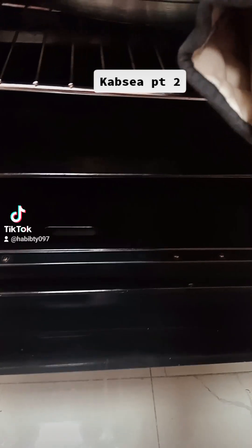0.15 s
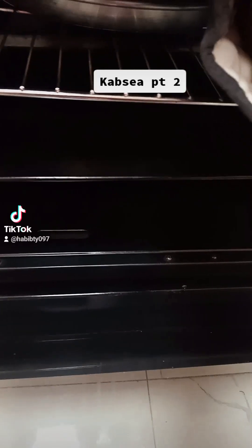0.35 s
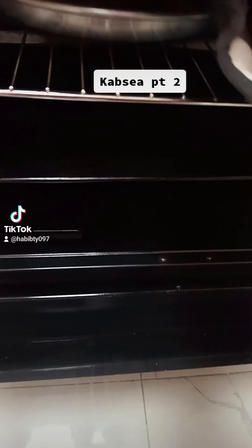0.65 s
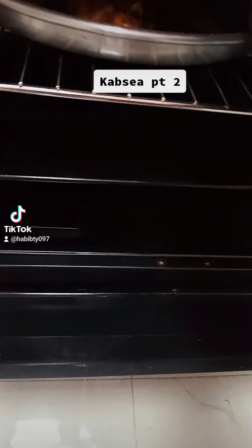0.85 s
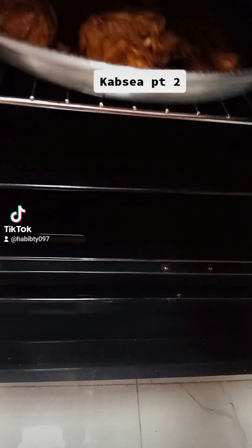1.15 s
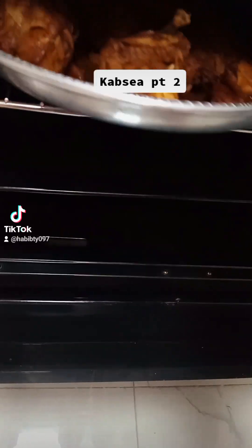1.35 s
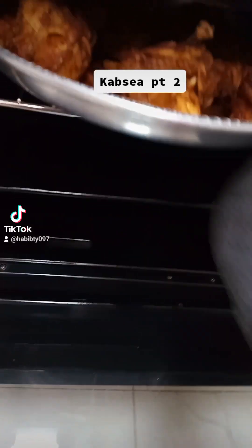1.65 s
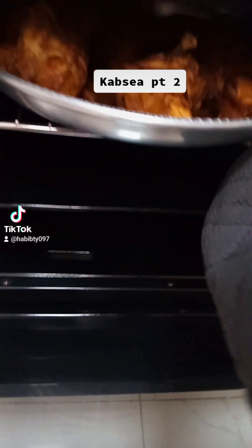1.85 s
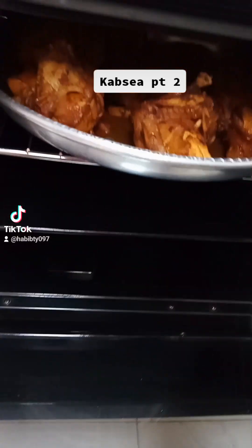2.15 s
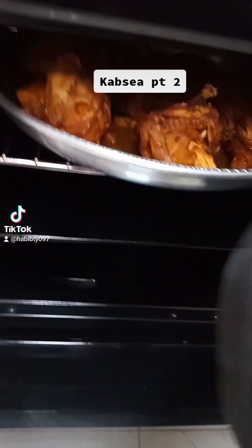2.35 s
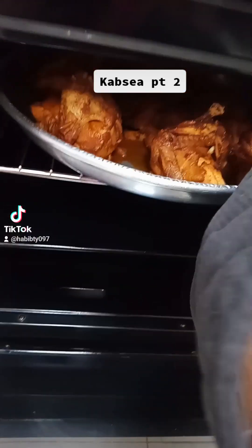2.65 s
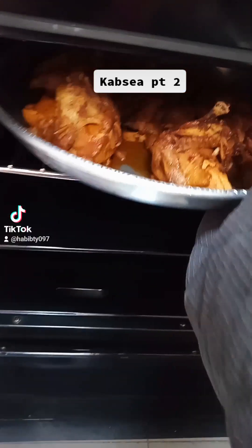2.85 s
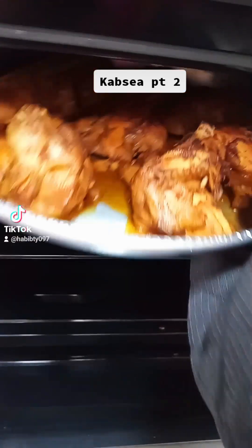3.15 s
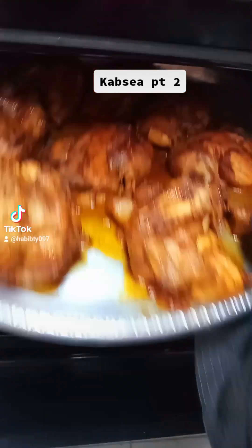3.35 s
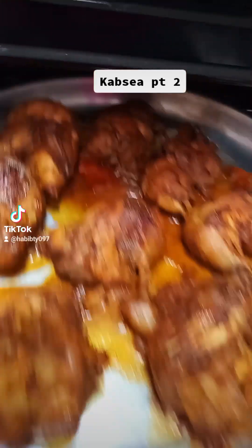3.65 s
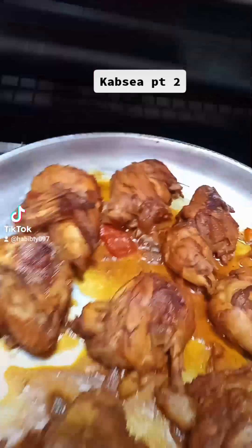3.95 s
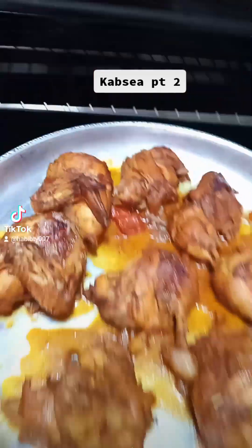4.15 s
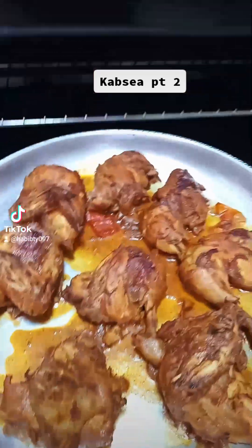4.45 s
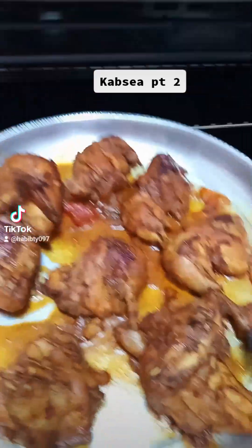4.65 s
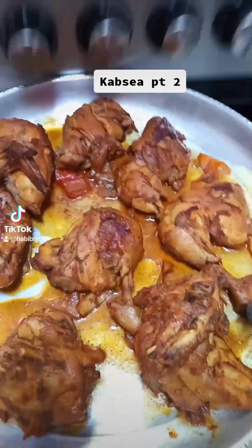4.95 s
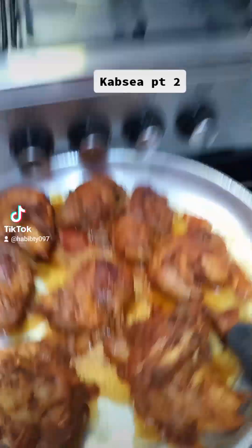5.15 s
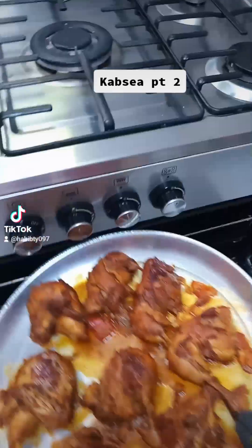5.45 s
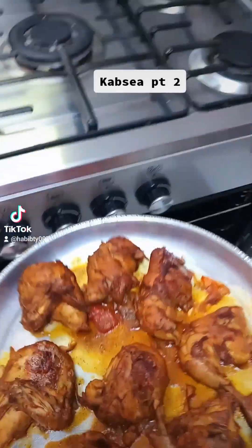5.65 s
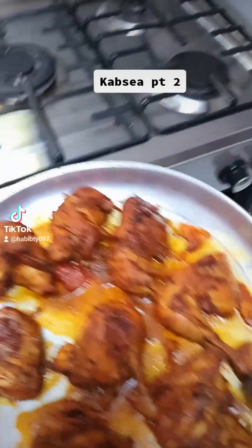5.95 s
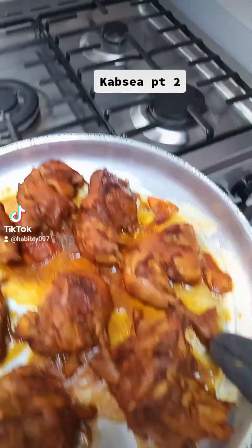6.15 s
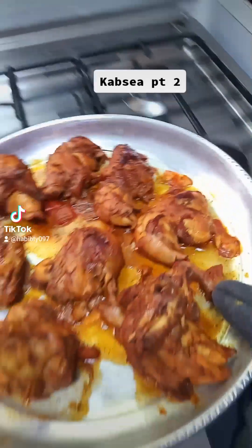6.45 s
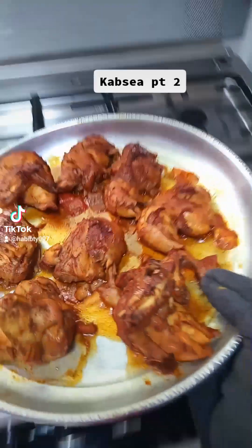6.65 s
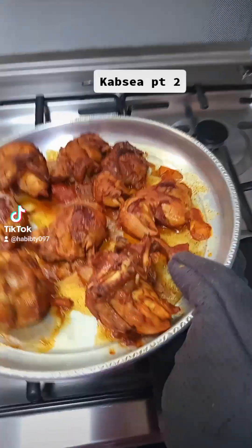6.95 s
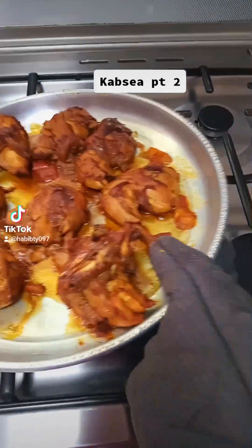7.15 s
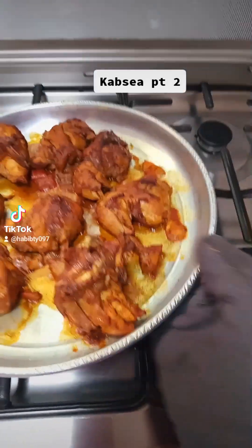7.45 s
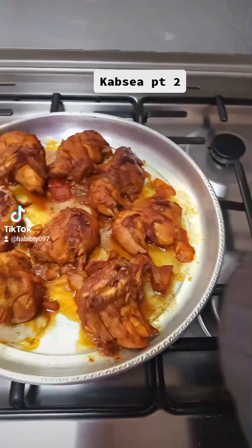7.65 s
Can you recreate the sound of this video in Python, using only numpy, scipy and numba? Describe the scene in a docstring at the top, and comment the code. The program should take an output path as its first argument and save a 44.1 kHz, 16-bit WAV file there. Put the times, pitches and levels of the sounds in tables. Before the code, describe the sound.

In a small hard kitchen, close to a handheld phone, a mitt softly bumps a metal tray. Light wiry ticks follow, then a rattle and a rough scrape over the oven rack, leaving wires ringing. After a lull come loud bangs on the oven door. Another pause, then the tray clatters onto an iron stove grate, slides shortly and rings out over faint hum and hiss.

```python
"""A mitt's soft tug, wiry scrapes and rattles, hard bangs, then iron clatter and a short slide, over faint hum and hiss.
A round metal tray is tugged by a mitt, scraped over a wire oven rack, bumped on the oven door and set down
and slid on an iron stove grate. Contact grit and blows make a dense wash that feeds the modes of each body;
wires, bars and the tray skin sing on as decaying sines. A small hard kitchen adds echoes, and a hand-held
phone with two ports hears it all."""
import sys
import numpy as np
from scipy import signal
from scipy.fft import rfft, irfft, next_fast_len
from scipy.io import wavfile
from scipy.ndimage import uniform_filter1d
from numba import njit

SR = 44100
rng = np.random.default_rng(int(sys.argv[2]) if len(sys.argv) > 2 else 0)


def output_pcm(signal):
    """Save a mono or channel-first signal as 16-bit PCM at the path in sys.argv[1].

    Samples are clipped to [-1, 1] before scaling.
    """
    pcm = np.clip(np.atleast_2d(signal).T, -1, 1) * 32767
    wavfile.write(sys.argv[1], SR, np.round(pcm).astype(np.int16))


N = 344421
TIME = np.arange(N) / SR
PORT_LAG = 8  # samples by which the left port hears later


def undb(db):
    """Amplitude ratio of a level in dB."""
    return 10 ** (np.asarray(db) / 20)


def unit(x):
    """Scale to an RMS of 1."""
    return x / np.sqrt(np.mean(x ** 2))


def ring(x, hz, width_hz):
    """Two-pole resonance, gain 1 at its centre."""
    return signal.lfilter(*signal.iirpeak(hz, hz / width_hz, SR), x)


def tone_level(tone, hz):
    """Level in dB of a spectrum at a frequency, straight between its points on a log axis."""
    tone_hz, tone_db = np.transpose(tone)
    return np.interp(np.log(hz), np.log(tone_hz), tone_db)


def colour(x, tone, lo_hz, hi_hz):
    """Shape by a spectrum, then part into boom, middle and edge, each of unit strength."""
    length = x.shape[-1]
    size = next_fast_len(length)
    hz = np.arange(size // 2 + 1) * SR / size + 1
    shaped = rfft(x, size) * undb(tone_level(tone, hz))
    low = 1 / (1 + (hz / lo_hz) ** 4)
    high = 1 / (1 + (hi_hz / hz) ** 6)
    return [unit(irfft(shaped * band, size)[..., :length]) for band in (low, 1 - low - high, high)]


def ports(size, alike_hz, grit_db):
    """Gritty noise at both ports: the left one lags, and above alike_hz each hears more of its own."""
    grit = np.minimum(rng.exponential(size=size + PORT_LAG), 5)
    grains = rng.standard_normal((3, size + PORT_LAG)) * undb(grit_db * grit)
    shared = np.array([grains[0, :size], grains[0, PORT_LAG:]])
    own = signal.lfilter(*signal.butter(1, alike_hz, "high", fs=SR), grains[1:, :size])
    return shared + 1.11 * own


def walk(rate, size=N):
    """Random levels held 1 / rate s and slewed twice."""
    hold = int(SR / rate)
    steps = np.repeat(rng.standard_normal(size // hold + 1), hold)
    slewed = uniform_filter1d(uniform_filter1d(steps, hold), hold)
    return 1.31 * slewed[:size]


def tray_pan(s):
    """Left minus right level in dB of the tray at time s, as the phone follows it."""
    # place of the tray: t/s, left minus right level/dB
    pan_path = [(0, -4), (1.2, -5), (2.2, -1.5), (2.9, -7.5), (3.4, -0.5), (4.7, -2), (5.0, 0.5),
                (6.55, -2), (6.8, -1), (7.16, -1.5), (7.3, -0.5), (7.81, 0.5)]
    return np.interp(s, *np.transpose(pan_path))


def air():
    """Kitchen background: coloured noise whose hum and hiss follow slow level curves and waver."""
    # background levels: t/s, hum level/dB, hiss level/dB
    air_levels = [(0, -62.5, -62), (1.2, -62, -62.5), (2.1, -64, -68), (3.5, -63.5, -63), (4.5, -63.5, -67),
                  (5.901, -63, -67.5), (7.099, -65, -65.5), (7.81, -71, -73)]
    # noise spectrum: f/Hz, level per Hz/dB
    air_tone = [(25, -48), (55, -17), (90, 2), (125, -6), (200, -1.5), (300, -5), (600, -13), (2000, -26),
                (4000, -22), (6300, -16), (7500, -18.5), (9500, -12.5), (11500, -28), (13300, -29.5),
                (15200, -16.5), (16500, -36)]
    s, hum_db, hiss_db = np.transpose(air_levels)
    hum_db, hiss_db = np.interp(TIME, s, hum_db), np.interp(TIME, s, hiss_db)
    low, mid, high = colour(ports(N, 500., 0.5), air_tone, 1200., 3000.0)
    hum = low * undb(hum_db + 1.2 * walk(4.3))
    middle = mid * undb((hum_db + hiss_db) / 2 - 4.0 + walk(4.6))
    hiss = high * undb(hiss_db + walk(21))
    return hum + middle + hiss


def rattle(s, db, fade_db_s, length, boom_db, edge_db):
    """A rattle as a stroke: quick rise, steady fade that dulls it, quick stop."""
    rise_s, stop_s = 0.015, 0.053
    drop_db = fade_db_s * length
    times = s + np.array([0, rise_s, length, length + stop_s])
    levels = db - np.array([16, 0, drop_db, drop_db + 31.0])
    # the edge loses an extra 0.18 dB for each dB of fade
    edges = edge_db - 0.18 * drop_db * np.array([0, 0, 1, 1])
    return times, levels, edges, boom_db


def contact(slide, slide_boom_db, rattles, hits, judder_db, boom_lag):
    """Power that strokes and blows put into boom, middle and edge at both ports."""
    power = np.zeros((3, 2, N))
    sides = np.array([[1], [-1]])
    # stick and slip is never even, and each band catches partly on its own
    judder = judder_db * (walk(60) + 0.8 * np.array([walk(40), walk(70), walk(110)]))
    strokes = [rattle(*row) for row in rattles]
    if slide:
        strokes.append((*np.transpose(slide), slide_boom_db))
    for s, db, edge_db, boom_db in strokes:
        on = slice(int(s[0] * SR), int(s[-1] * SR))
        t, top_db = TIME[on], db.max()
        db, edge_db = np.interp(t, s, db), np.interp(t, s, edge_db)
        # once the contact has begun, the boom follows only part of each drop in level
        boom_db = boom_db + boom_lag * (top_db - db) * (t > s[1])
        bands = db + judder[:, on] + np.array([boom_db, 0 * db, edge_db])
        # the higher the band, the more it shows where the tray is
        pan_db = np.array([0, .5, 1])[:, None, None] * sides * tray_pan(t)
        power[:, :, on] += undb(2 * bands[:, None] + pan_db)
    for s, db, boom_db, edge_db, t60, _ in hits:
        on = slice(int(s * SR), int((s + 1.5 * t60) * SR))
        t = TIME[on] - TIME[on][0]
        # the boom swells late and stays, the edge cracks at once and dies first
        rise = 1 - np.exp(-t / np.array([[.004], [.0009], [.0005]]))
        rise[1:] *= 1 + 1.3 * np.exp(-t / 0.0028)  # the crack of first contact
        fade_db = 60 * t / (t60 * np.array([[1.6], [1], [.7]]))
        bands = db - 12.5 + np.array([[boom_db], [0], [edge_db]]) - fade_db
        power[:, :, on] += (rise ** 2 * undb(2 * bands))[:, None] * undb(sides * tray_pan(s))
    return power


@njit
def moving_ring(x, hz, width_hz):
    """Resonance whose centre moves from sample to sample, gain 1 at the centre."""
    y = np.empty_like(x)
    for c in range(len(x)):
        band, low = 0., 0.  # the two filter states
        for i in range(len(hz)):
            g, damping = np.tan(np.pi * hz[i] / SR), width_hz / hz[i]
            v = (band + g * (x[c, i] - low)) / (1 + g * (g + damping))
            band, low, y[c, i] = 2 * v - band, low + 2 * g * v, damping * v
    return y


def struck(hits, start, size, hz, width_hz, db):
    """One mode rung by every blow and left to die; the left port hears it later by a varying lag."""
    taps = np.zeros((2, size + 64))
    for (s, hit_db, *_), (strength, side) in zip(hits, rng.standard_normal((len(hits), 2))):
        at = int(s * SR) - start + np.array([PORT_LAG + int(6 * abs(side)), 0])
        # each blow lands elsewhere and wakes the mode more or less
        scatter_db = 3 * strength
        taps[[0, 1], at] += undb(hit_db + db + scatter_db + np.array([.5, -.5]) * tray_pan(s))
    # a narrow resonance answers a click weakly: lift it back to the click's level
    return ring(taps[:, :size], hz, width_hz) * SR / (2 * np.pi * width_hz)


def clinks(hits, t60, clink_db):
    """Each blow wakes a rough cluster of modes and two bar overtones above the rest."""
    out = np.zeros((2, N))
    t = np.arange(int(t60 * SR)) / SR
    share = np.array([[1], [.5], [.5], [.55], [.35]])
    for (s, db, *_, hz), chance in zip(hits, rng.random((len(hits), 2, 5, 1))):
        # each blow lands on its own spot, so the ratios vary a little
        ratio = np.array([[1], [.9], [1.04], [1.38], [1.95]]) * (1 + 0.013 * chance[0])
        clink = np.sum(share * np.sin(2 * np.pi * (hz * ratio * t + chance[1])), axis=0)
        clink *= undb(db + clink_db - 60 * t / t60) * (1 - np.exp(-t / 0.00069))
        panned = clink * undb(np.array([[.5], [-.5]]) * tray_pan(s))
        out[:, int(s * SR):][:, :len(t)] += panned[:, :N - int(s * SR)]
    return out


def metal(slide, slide_boom_db, rattles, hits, modes, tone, boom_lag, clink_db, modes_db, grit_db,
          judder_db, comb_db, sharp, linger_db, patchy_db, strike_db, linger_hz=6.9):
    """One body: contact grit makes a dense wash and feeds the named modes, which ring on after it."""
    power = contact(slide, slide_boom_db, rattles, hits, judder_db, boom_lag)
    touched = np.flatnonzero(power[1, 0])
    tail_s = .6
    on = slice(touched[0], min(touched[-1] + int(tail_s * SR), N))
    size = on.stop - on.start
    parts = colour(ports(size, 1200.0, grit_db), tone, 509.0, 3770.0)
    wash = sum(np.sqrt(p[:, on]) * x for p, x in zip(power, parts)) + 1e-18
    # countless small plate modes: a ragged bank of weak narrow resonances
    t = np.arange(3000) / SR
    plate = unit(rng.standard_normal(3000) * np.exp(-t / 0.016)) / np.sqrt(3000)
    body = wash + undb(comb_db) * signal.fftconvolve(wash, plate[None], axes=1)[:, :size]
    for hz, width_hz, db in modes:
        over_db = db - tone_level(tone, hz)
        # the contact point wanders, so each mode is fed unevenly and shifts a little
        feed = wash * undb(patchy_db * walk(18, size=size))
        drifting_hz = hz * (1 + .004 * walk(12, size=size))
        mode = moving_ring(feed, drifting_hz, width_hz / sharp)
        body += undb(modes_db + over_db) * np.sqrt(sharp) * mode
        # the heart of each mode is barely damped and lingers in the tail
        body += undb(linger_db + 0.33 * over_db) * ring(feed, hz, linger_hz * (1 + hz / 2500))
        body += struck(hits, on.start, size, hz, np.clip(0.5 * width_hz, 6, 40), strike_db + db)
    out = clinks(hits, 0.084, clink_db)
    out[:, on] += body
    return out


def mitt_tug():
    """The mitt rubs and nudges the tray: a boomy stroke and one dull blow."""
    # rubbing stroke: t/s, level/dB, edge re middle/dB
    mitt_slide = [(0.15, -74.5, 8), (0.25, -58.5, -2), (0.38, -49, -0.5), (0.432, -54.5, -1),
                  (0.572, -56, -4), (0.62, -77, -4)]
    # blow: t/s, level/dB, boom and edge re middle/dB, middle t60/s, clink f/Hz
    mitt_hits = [(0.276, -42.5, 22, -12, 0.098, 480)]
    # modes: f/Hz, width before sharpening/Hz, relative level/dB
    mitt_modes = [(171.5, 11, 3), (500, 59, -9.5), (701, 15, -17), (1990, 40, -29)]
    # colour of the dense wash: f/Hz, relative level per Hz/dB
    mitt_tone = [(18, -60), (30, -21), (176, -3), (212, -4), (493, -19.5), (593, -23.5), (676, -20),
                 (979, -29), (8990, -28.5), (15200, -45), (16500, -57)]
    return metal(mitt_slide, 7.5, [], mitt_hits, mitt_modes, mitt_tone, boom_lag=0.46, clink_db=-15.0,
                 modes_db=-6.0, grit_db=0.5, judder_db=2.0, comb_db=-11.0, sharp=2.2,
                 linger_db=-13.0, patchy_db=2.0, strike_db=-12)


def rack_scrape():
    """The tray knocks, rattles and scrapes over the wire rack, which rings in many broad modes."""
    # scrape: t/s, level/dB, edge re middle/dB
    rack_slide = [(2.8, -55, -14), (2.885, -53.5, -7), (2.927, -44, -5.5), (2.969, -47.5, -5),
                  (3.0, -32.5, -9), (3.076, -30.5, -7.5), (3.14, -31.5, -8.5), (3.198, -34.5, -4),
                  (3.27, -30.5, -10), (3.34, -31.5, -8), (3.37, -38.5, -28), (3.478, -46.5, -48),
                  (3.568, -68, -3), (3.66, -81, 11)]
    # rattles after jolts: t/s, level/dB, fade/(dB/s), length/s, boom and edge re middle/dB
    rack_rattles = [(0.791, -57, 42, 0.18, -35, -3), (2.191, -39.5, 86, 0.32, 1, -6.5),
                    (2.538, -63, 2, 0.13, 1.5, 4.5), (2.666, -46.5, 68, 0.229, -14.5, -2.5)]
    # blows: t/s, level/dB, boom and edge re middle/dB, middle t60/s, clink f/Hz
    rack_hits = [(0.559, -45, -22, -3, 0.17, 4460), (0.816, -35.5, -30, 2.5, 0.028, 3690),
                 (0.829, -42, -35, -26, 0.14, 3710), (1.023, -55, -11, -17, 0.15, 1330),
                 (1.143, -54, -18, -13, 0.1, 1390), (1.183, -53, -30, 4, 0.28, 3440),
                 (2.205, -36, -14, 11.5, 0.12, 2050), (2.563, -46.5, -8, -15, 0.091, 4240),
                 (2.65, -43, -11, -10, 0.12, 3190), (2.689, -33, -24, -12, 0.11, 3080),
                 (2.761, -39.5, -6, 4.5, 0.25, 1230), (2.928, -34.5, -14.5, -2, 0.17, 2100),
                 (2.98, -30, -13.5, 2, 0.14, 826), (3.007, -26, -18, 8, 0.11, 2034),
                 (3.204, -28.5, -5, -4, 0.2, 1890), (3.226, -29, -7, -5, 0.15, 1690),
                 (3.272, -32, -8, -5, 0.1, 2500), (3.336, -22, -21, -12, 0.044, 806)]
    # modes: f/Hz, width before sharpening/Hz, relative level/dB
    rack_modes = [(178, 32, -2), (235.4, 56, -3.5), (595, 50, -11.5), (770, 98, -6), (977, 50, -24),
                  (1692, 29, -22), (1980, 50, -15.5), (2096, 78, -8), (2450, 110, -10), (3220, 60, -14),
                  (3180, 980, -22), (3670, 110, -19), (4100, 110, -12), (5850, 120, -14), (6650, 80, -15),
                  (7280, 100, -14.5), (8000, 42, -23.5), (8760, 240, -16.5)]
    # colour of the dense wash: f/Hz, relative level per Hz/dB
    rack_tone = [(18, -83), (30, -28), (70, -9), (107, -17), (167, 0), (260, -2.5), (350, 0), (378, -4.5),
                 (577, -5.5), (713, -10), (2000, -14.5), (9730, -25), (13400, -48), (15200, -32.5),
                 (16500, -59)]
    return metal(rack_slide, -10.5, rack_rattles, rack_hits, rack_modes, rack_tone, boom_lag=0.39,
                 clink_db=-4.0, modes_db=-6.0, grit_db=4, judder_db=2.0, comb_db=-6, sharp=0.51,
                 linger_db=-10.0, patchy_db=6.0, strike_db=-15.5)


def mode_flares():
    """Short bursts of single modes of the tray, rack, door and grate, each sliding in pitch."""
    # bursts: t/s, length/s, level/dB, start f/Hz, glide/(Hz/s)
    flares = [(0.822, 0.15, -62, 900, -300), (0.83, 0.12, -60, 512, -200),
              (2.212, 0.22, -41.5, 259.8, -300), (2.218, 0.088, -44.5, 423, -200),
              (2.248, 0.14, -49.5, 667, 14), (2.46, .22, -55, 319, 40), (2.688, 0.032, -40.5, 560, 10),
              (2.932, 0.032, -35.5, 586, 10), (3.002, 0.019, -23.5, 623, 10),
              (3.052, 0.013, -21.5, 535, 1500), (3.066, 0.02, -19, 578, 1500),
              (3.14, 0.024, -45, 1970, 300), (3.222, 0.07, -34, 1710, -200), (3.413, 0.12, -43.5, 303, 300),
              (3.49, 0.071, -47.5, 998, -100), (3.09, 0.18, -35, 175.9, -32),
              (3.101, 0.039, -30, 557, -300), (3.203, 0.034, -22.5, 608, -1800),
              (3.264, 0.018, -27, 563, -300), (3.748, 0.082, -52.5, 333, 8), (4.66, 0.016, -28, 300, -1500),
              (4.876, 0.021, -22, 910, -3000), (4.877, .014, -26.5, 638, 300),
              (4.878, 0.026, -26, 2130, -300), (6.55, 0.055, -29.5, 210.4, 10),
              (7.27, 0.054, -29.5, 228, 10), (7.33, 0.079, -24.5, 1034, 15), (7.33, 0.043, -35, 712, 8),
              (7.345, 0.05, -36, 1465, 10), (7.49, 0.086, -34.5, 710, 7), (7.55, 0.16, -37, 429, -27),
              (7.67, 0.069, -61, 2710, 8.5)]
    out = np.zeros((2, N))
    for s, length, db, hz, glide in flares:
        t = TIME[:min(int(1.4 * length * SR), N - int(s * SR))]
        swell = np.minimum(t / 0.011, 1) * np.exp(-(t / length) ** 4)
        late = t - np.array([[PORT_LAG / SR], [0]])
        burst = swell * np.sin(2 * np.pi * (hz + glide * late / 2) * late)
        level = undb(db + np.array([[.5], [-.5]]) * tray_pan(s))
        out[:, int(s * SR):][:, :len(t)] += np.sqrt(2) * burst * level
    return out * undb(3.5 * walk(70))  # roughens every burst


def singing(modes, free_s, spread, swell_s, flutter_db):
    """Free rods and plates swell and die away; each mode is five untuned neighbours that beat and waver."""
    start = int(free_s * SR)
    t = TIME[:N - start]
    out = np.zeros((2, N))
    share = np.array([[.5], [.7], [1], [.7], [.5]])
    for (hz, db, t60), chance in zip(modes, rng.random((len(modes), 3, 5, 1))):
        span = t[:int(t60 * SR)]
        size = len(span)
        near_hz = hz + (8.0 + spread * hz) * (np.arange(-2, 3)[:, None] + chance[0] - .5)
        waver = np.cumsum(spread * hz * walk(50, size=size)) / SR
        fade = undb(db - 60 * span / t60 + flutter_db * walk(35, size=size))
        fade *= np.minimum(span / swell_s, 1)
        # higher modes reach the ports out of step
        for port, shift in enumerate((min(hz / 2000, 1) * chance[2], 0)):
            cycles = near_hz * span + waver + chance[1] + shift
            out[port, start:start + size] += fade * np.sum(share * np.sin(2 * np.pi * cycles), axis=0)
    return out


def rack_wires():
    """Rack wires sing on as the scrape fades."""
    # wires: f/Hz, level/dB, t60/s
    wires = [(320, -62, 6.6), (665, -59.5, 1.9), (950, -66, 6.2), (1010, -53.5, 1.2), (1520, -44.5, 0.79),
             (1693, -48.5, 1), (1930, -59, 2.14), (2166, -47, 0.68), (2360, -63, 0.82), (3140, -58, 1.5)]
    return singing(wires, free_s=3.364, spread=.008, swell_s=0.11, flutter_db=3.5)


def ticks():
    """Thin ticks: each is one very short high sine that dies within milliseconds."""
    # ticks: t/s, level/dB, f/Hz
    tick_rows = [(4.503, -56.5, 9160), (4.562, -44, 10300), (4.58, -59, 10200)]
    out = np.zeros(N)
    t = np.arange(400) / SR
    shape = np.exp(-t / 0.0037) * np.minimum(t / 0.00057, 1)
    for s, db, hz in tick_rows:
        out[int(s * SR):][:400] += undb(db) * shape * np.sin(2 * np.pi * hz * t)
    return out * undb(np.array([[1.5], [-1.5]]))


def door_bumps():
    """The tray bumps the oven door: first dull thuds on the panel, then blows that ring its frame."""
    # rattles after jolts: t/s, level/dB, fade/(dB/s), length/s, boom and edge re middle/dB
    door_rattles = [(4.609, -59.5, 22.14, 0.023, 21.5, 10), (4.659, -26.5, 99, 0.11, -1.5, -5),
                    (4.794, -31.5, 170, 0.075, -22.5, -1.5), (4.877, -28, 176, 0.073, -9, -17),
                    (4.941, -34.5, 140, .15, 0, -0.5)]
    # blows: t/s, level/dB, boom and edge re middle/dB, middle t60/s, clink f/Hz
    door_hits = [(4.661, -13, -4.5, -1, 0.088, 898), (4.679, -24.5, -8.5, -6.5, .12, 850),
                 (4.796, -7, -25, -10.5, 0.074, 3376), (4.808, -12, -19.5, -10.5, 0.044, 2050),
                 (4.834, -12, -24, -22.5, 0.024, 2030), (4.879, -9.5, -21, -21.5, 0.068, 915),
                 (4.942, -14, -13.5, 1.5, 0.05, 961)]
    # panel modes, then frame modes: f/Hz, width before sharpening/Hz, relative level/dB
    panel_modes = [(308, 35, -3), (870, 120, -5), (2000, 42, -9.5), (2620, 170, -19), (3320, 38, -13.5),
                   (4000, 48, -11), (4900, 34, -13.5), (5830, 32, -14.5), (6800, 190, -16)]
    frame_modes = [(306, 33, -3.5), (796, 62, 0), (1068, 30, 1), (1537, 50, 0.5), (2004, 41, 2),
                   (2190, 50, -0.5), (2650, 36, -2.5), (3010, 21, -12.5), (3374, 56, 1), (4050, 49, 0),
                   (4900, 30, -10), (5670, 42, -12), (5900, 40, -11), (7000, 43, -11), (9480, 1900, -10.5)]
    # colour of each dense wash: f/Hz, relative level per Hz/dB
    panel_tone = [(18, -67), (30, -32.5), (96, -7), (185, -7), (306, -7), (388, -14), (752, -12),
                  (4070, -21.5), (9730, -28.5), (15200, -57), (16500, -67)]
    frame_tone = [(18, -52.5), (30, -20), (75, -8.5), (200, 3.5), (306, 0), (506, -4), (1030, -6.5),
                  (1660, -16), (2100, -2.5), (2400, -11), (3380, -14), (3660, -12.5), (7090, -4),
                  (15200, -43), (16500, -59.5)]
    panel = metal([], 0, door_rattles[:2], door_hits[:2], panel_modes, panel_tone, boom_lag=0.37,
                  clink_db=-12.5, modes_db=-4, grit_db=1.0, judder_db=1.2, comb_db=-11.0, sharp=0.8,
                  linger_db=-12.0, patchy_db=2.5, strike_db=-5.5)
    frame = metal([], 0, door_rattles[2:], door_hits[2:], frame_modes, frame_tone, boom_lag=0.28,
                  clink_db=-11.5, modes_db=-7.0, grit_db=1.3, judder_db=1.26, comb_db=-11.0, sharp=0.79,
                  linger_db=-15.5, patchy_db=4.0, strike_db=-20.5, linger_hz=24.)
    return panel + frame


def creaks():
    """Small creaks: a train of rough slips, each a fading noise burst, rings three dull resonances."""
    # creaks: t/s, length/s, level/dB, mean slip rate/Hz, low f/Hz, middle f/Hz, high f/Hz
    creak_rows = [(5.836, 0.096, -67.5, 120, 500, 2960, 3820), (6.006, 0.1, -54, 170, 1680, 2220, 3200)]
    out = np.zeros(N)
    for s, length, db, rate, lo_hz, mid_hz, hi_hz in creak_rows:
        t = np.arange(int(length * SR)) / SR
        phase = np.cumsum(rate * (1 + 0.2 * walk(150)[:len(t)])) / SR % 1
        slips = rng.standard_normal(len(t)) * (np.exp(-phase / 0.43) + 0.4)
        slips *= undb(-16 * t / length) * np.minimum(t / 0.0054, 1)
        bands = ((lo_hz, 500.), (mid_hz, 900.), (hi_hz, 1800.))
        low, mid, high = [ring(ring(slips, hz, width), hz, width) for hz, width in bands]
        out[int(s * SR):][:len(t)] += undb(db) * unit(low + 0.65 * mid + 0.092 * high)
    return out * undb(np.array([[1.5], [-1.5]]))


def grate_landing():
    """Set down on the iron grate: first only the rim touches, then the whole tray lands and slides."""
    # slide: t/s, level/dB, edge re middle/dB
    grate_slide = [(7.165, -20.5, 2.5), (7.189, -28.5, 5), (7.329, -28, -2.5), (7.357, -24, -5),
                   (7.421, -31.5, -4), (7.46, -33.5, -12), (7.51, -39.5, -25), (7.52, -35, -8),
                   (7.586, -36, -21), (7.67, -59.5, -23), (7.81, -99, -2)]
    # rattles after jolts: t/s, level/dB, fade/(dB/s), length/s, boom and edge re middle/dB
    grate_rattles = [(6.547, -31, 107, 0.13, 2.6, -1.5), (6.708, -35.5, 89.6, 0.19, 0.68, 1.5),
                     (6.887, -44.5, 200, .2, 4.8, -3.5)]
    # blows: t/s, level/dB, boom and edge re middle/dB, middle t60/s, clink f/Hz
    grate_hits = [(6.549, -19, -16, 7, 0.082, 3860), (6.63, -18, -16, 1.5, 0.066, 3140),
                  (6.706, -17, -27, 6.5, 0.06, 3360), (6.748, -16, -18, 4, 0.039, 3100),
                  (6.795, -22.5, 0, 3, 0.12, 3140), (6.893, -28.5, 0, -20, 0.066, 1910),
                  (7.161, -15.5, -12.5, 7.5, 0.12, 2403), (7.169, -7, -19, -3, 0.11, 2360),
                  (7.227, -11, -23, 2.5, 0.11, 1460), (7.286, -15, 1.5, -9, 0.19, 2580),
                  (7.346, -17.5, -17, -14, 0.088, 1440), (7.4, -15, -7, -16, 0.11, 1022),
                  (7.515, -17, -14, -10.5, 0.18, 1430), (7.595, -32, -8, -15, 0.08, 1464),
                  (7.67, -32, -4, -35, 0.11, 867)]
    # rim modes, then whole-tray modes: f/Hz, width before sharpening/Hz, relative level/dB
    rim_modes = [(214, 20, -1), (425, 26, -15.5), (1133, 7.6, -10.5), (2040, 94, -7.5), (2650, 160, -10),
                 (3160, 42, -14.5), (3425, 84, -5.5), (3750, 45, -8.5), (4040, 32, -13), (5050, 41, -38),
                 (5880, 280, -17), (6660, 190, -19), (7060, 78, -18), (7560, 96, -20), (8340, 37, -19)]
    grate_modes = [(99, 21, -5.5), (230.4, 49, -0.5), (286, 20, -14), (383, 30, -5.5), (425, 19, 4),
                   (633, 16, -6), (699.4, 22, 4), (1030, 13, -4.5), (1448, 57, 2), (1710, 32, -7.5),
                   (1990, 270, -9.5), (2260, 250, -10), (2610, 44, -15), (3140, 150, -12), (3620, 45, -31),
                   (4400, 34, -10), (4860, 39, -22.5), (5670, 32, -24), (5890, 220, -4.5), (6600, 58, -5),
                   (7290, 19, -37), (7700, 210, -23), (8700, 110, -12.5)]
    # colour of each dense wash: f/Hz, relative level per Hz/dB
    rim_tone = [(18, -69), (30, -41), (65, -25), (98, -10), (212, -15.5), (323, -15.5), (480, -12.5),
                (1030, -18), (2000, -19), (6550, -18.5), (15200, -35.5), (16500, -55)]
    grate_tone = [(18, -69), (30, -35.5), (65, -16), (100, -8.5), (229, -6), (562, -7), (694, -7.5),
                  (814, -8), (1030, -4), (1210, -14), (1420, -13.5), (8990, -12), (13700, -31),
                  (15200, -18), (16500, -66)]
    rim = metal([], 0, grate_rattles, grate_hits[:6], rim_modes, rim_tone, boom_lag=0.44,
                clink_db=-10.0, modes_db=-3.5, grit_db=0.1, judder_db=1.67, comb_db=-5.5, sharp=0.56,
                linger_db=-12, patchy_db=3.0, strike_db=-12.5)
    whole = metal(grate_slide, -8, [], grate_hits[6:], grate_modes, grate_tone, boom_lag=0.61,
                  clink_db=-9.0, modes_db=-6.0, grit_db=1.9, judder_db=0.93, comb_db=-7.0, sharp=1.05,
                  linger_db=-8, patchy_db=3.0, strike_db=-19.5)
    return rim + whole


def grate_bars():
    """Grate bars sing on as the slide fades."""
    # bars: f/Hz, level/dB, t60/s
    bars = [(215, -52, .65), (420, -48, .65), (834, -59, .5), (2030, -62, 0.48), (2710, -61, .55),
            (3370, -58, .65), (4090, -61, .65), (4880, -59, 0.65), (5060, -59, 0.85), (5860, -57, 0.82),
            (6450, -59, .75), (7010, -64, .65)]
    return singing(bars, free_s=7.5, spread=.0035, swell_s=.07, flutter_db=6.0)


def tray_skin():
    """The tray skin hums on as the slide dies away."""
    # skin modes: f/Hz, level/dB, t60/s
    skin = [(240, -42, 0.51), (412, -37.5, 0.62), (711, -46, 0.42), (880, -36, 0.34), (1450, -42, 0.36),
            (2680, -58, .5)]
    return singing(skin, free_s=7.56, spread=.005, swell_s=0.036, flutter_db=0.5)


def room(x):
    """Tiles and steel: a short decaying tail of echoes, duller than the source, wider in the treble."""
    t60_s, level_db = .3, -10
    t = np.arange(int(t60_s * SR)) / SR
    tail = ports(len(t), 650.0, 0) * undb(-60 * t / t60_s) * (t > .004)
    tail = signal.lfilter(*signal.butter(1, 5000., fs=SR), tail)
    return undb(level_db) * signal.fftconvolve(x, unit(tail) / np.sqrt(len(t)), axes=1)[:, :N]


def scene():
    """Everything struck, scraped or singing goes through the room; the background is added on top."""
    near = mitt_tug() + rack_scrape() + mode_flares() + rack_wires()
    near += ticks() + door_bumps() + creaks()
    near += grate_landing() + grate_bars() + tray_skin()
    return near + room(near) + air()


def record(dry):
    """The phone thins the deep bass, rounds the loudest peaks and cuts the top steeply."""
    thin = signal.sosfilt(signal.butter(2, 75., "high", fs=SR, output="sos"), dry)
    rounded = 0.81 * np.tanh(thin / 0.98)
    return signal.sosfilt(signal.ellip(10, .2, 90, 16300, fs=SR, output="sos"), rounded)


dry = scene()
out = record(dry)
output_pcm(out)
```